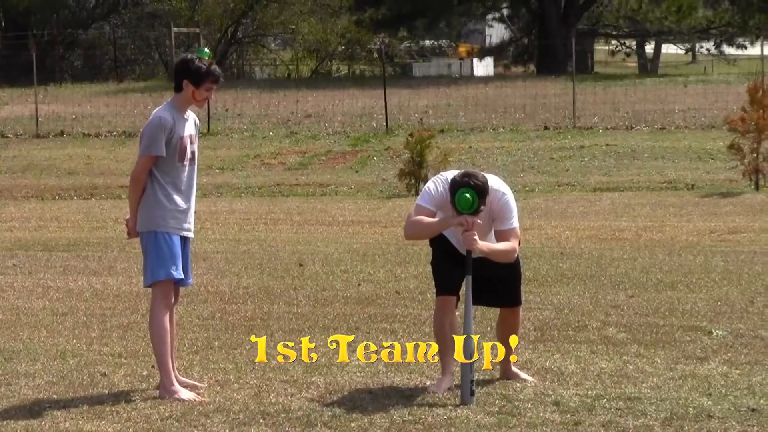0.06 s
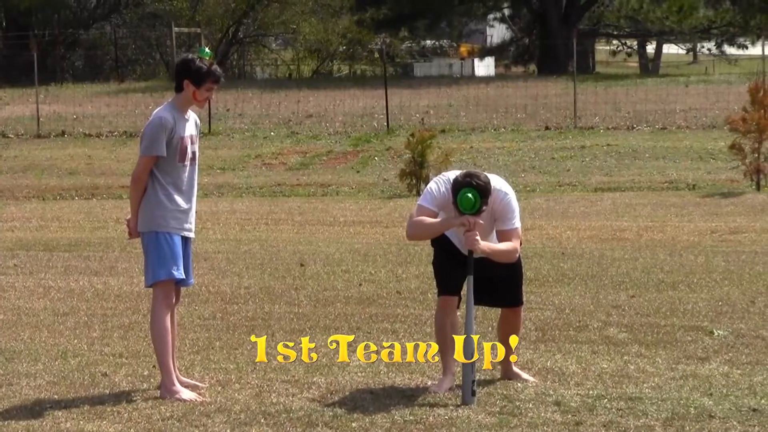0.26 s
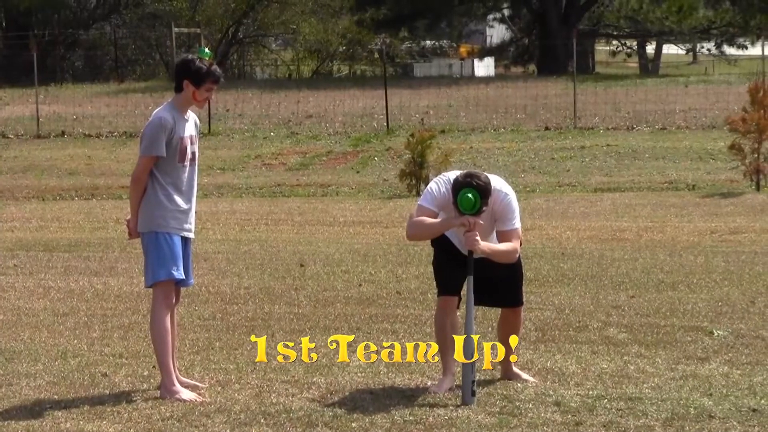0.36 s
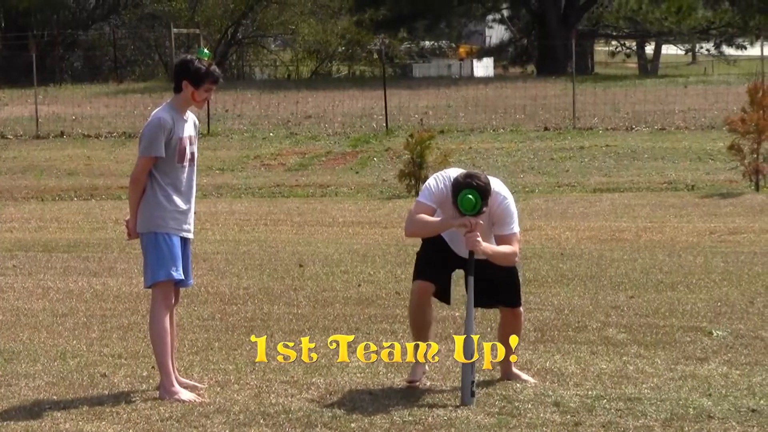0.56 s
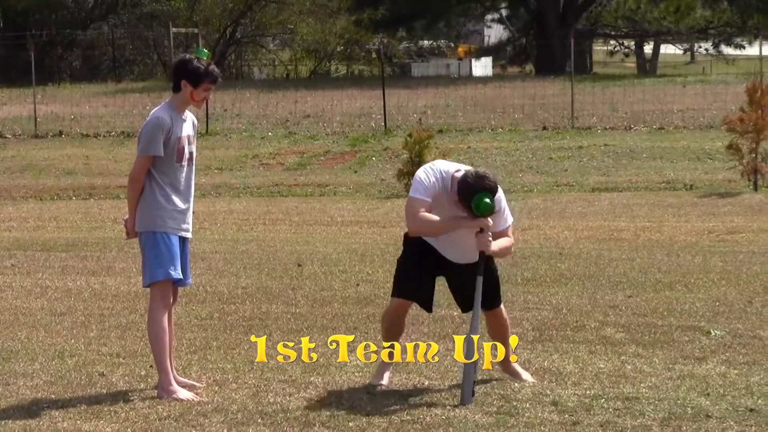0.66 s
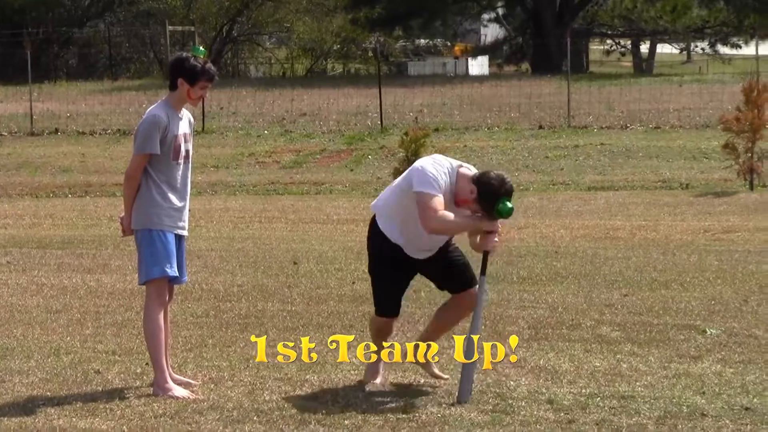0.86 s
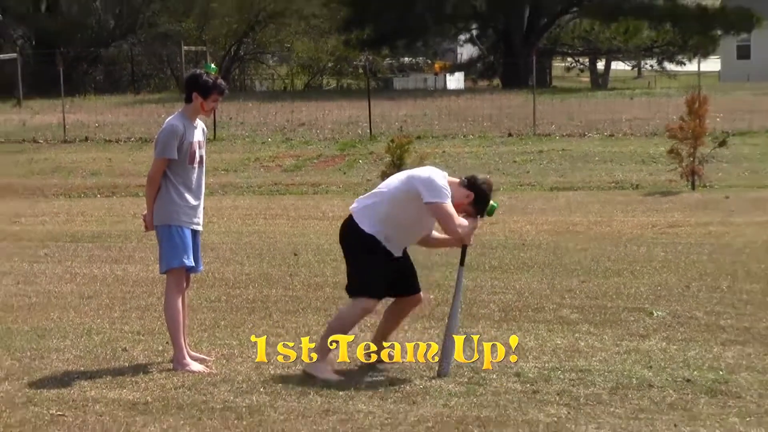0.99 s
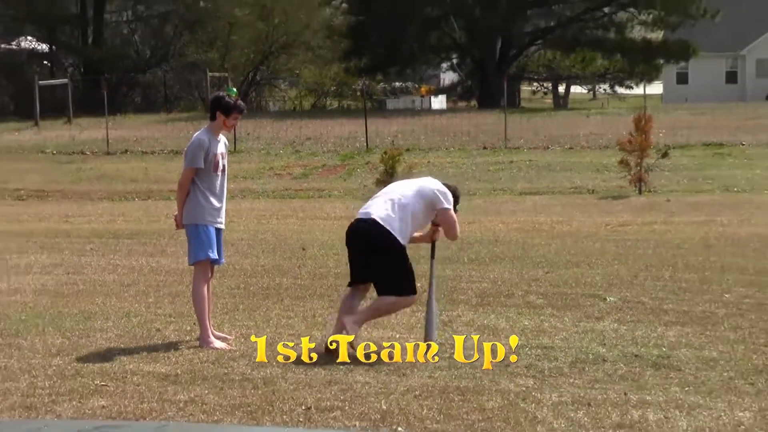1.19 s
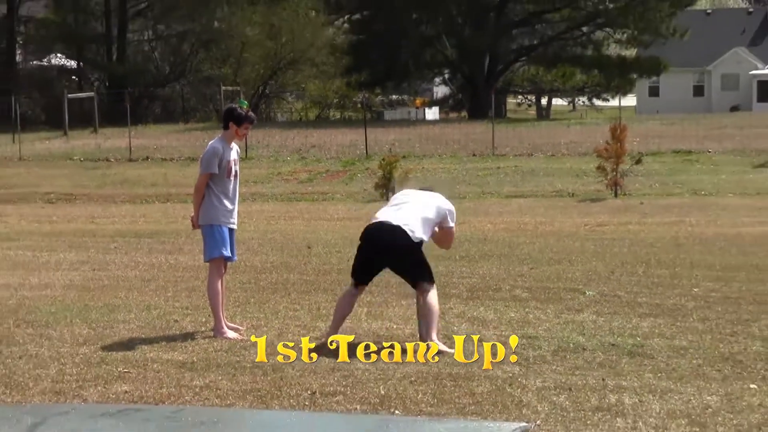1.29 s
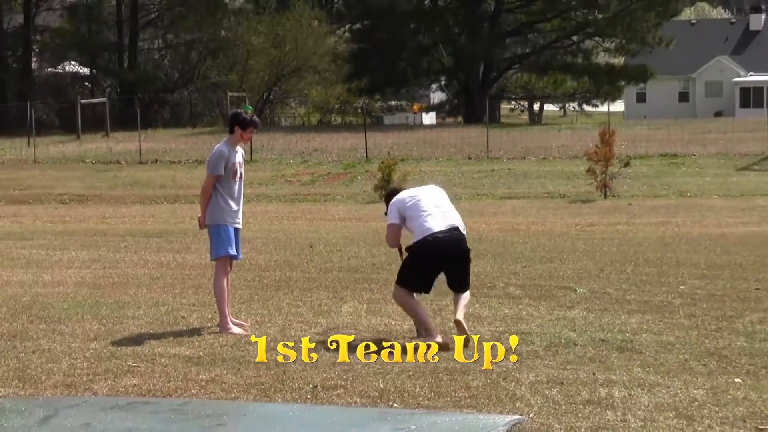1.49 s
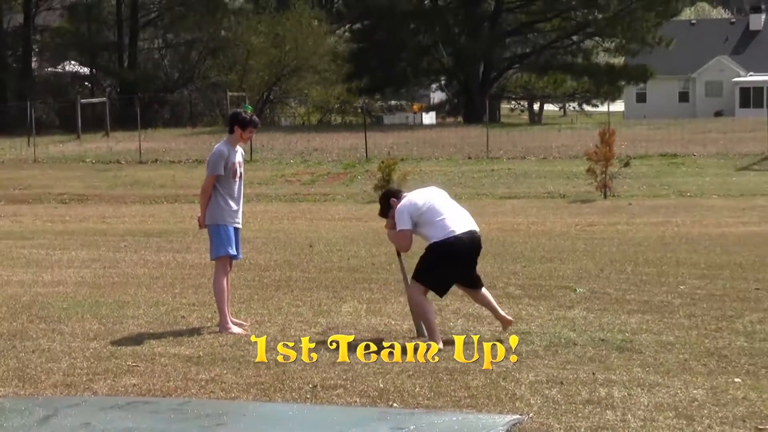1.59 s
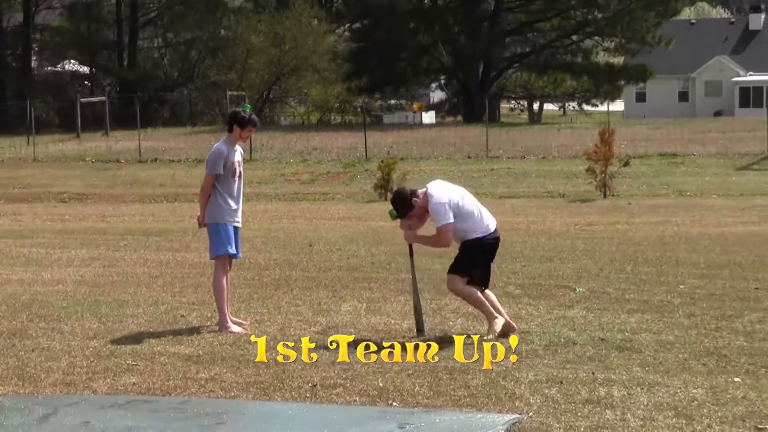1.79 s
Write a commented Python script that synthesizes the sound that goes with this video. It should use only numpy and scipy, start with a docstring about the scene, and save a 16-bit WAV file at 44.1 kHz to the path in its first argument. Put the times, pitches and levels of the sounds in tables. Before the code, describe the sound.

A handheld air horn close to the microphone gives one harsh blast under half a second long, starting with a squeal and settling into a steady blare; dull echoes fade into a quiet outdoor hush.

```python
"""Air horn in an open yard

A handheld air horn near the microphone gives one short blast: locked partials plus a breathy gas jet.
The diaphragm starts as a falling squeal an octave up, strains on its third partial, then drops into
its steady note. Nearby walls, a far house front and scattered trees return it as filtered echoes and
decaying noise, over a quiet outdoor hush of banded noise."""
import sys
import numpy as np
from scipy import signal
from scipy.io import wavfile
from scipy.ndimage import uniform_filter1d

SR = 44100
rng = np.random.default_rng(int(sys.argv[2]) if len(sys.argv) > 2 else 0)


def persist_wave(psi):
    """Save psi, clipped to +-1, as 16-bit WAV."""
    counts = np.round(np.clip(psi, -1, 1) * 32767).astype(np.int16)
    wavfile.write(sys.argv[1], SR, np.atleast_2d(counts).T)


N = 81585

START_S, STOP_S = .2358, .6263
ATTACK_S, RELEASE_S = .001, .0035
# Gas pressure driving the whole horn: (time [s], level [dB])
PRESSURE = [(.236, 2), (.25, 5), (.27, 2.5), (.3, 7.5), (.365, 10), (.38, 7), (.4, 5.5), (.45, 6),
            (.55, 4.5), (.62, 5)]


def horn():
    """Forced oscillation: gas pressure drives diaphragm and jet while the valve is open."""
    t = np.arange(N) / SR
    opening = (1 + np.tanh((t - START_S) / ATTACK_S - 1)) / 2
    closing = (1 - np.tanh((t - STOP_S) / RELEASE_S)) / 2
    return (diaphragm() + gas_jet()) * opening * closing * amp(in_time(PRESSURE))


STRAIN_HZ, STEADY_HZ, CREEP_HZ_PER_S = 929, 916.2, 9   # the steady note creeps up after the slip
SLIP_AT_S, SLIP_S = .374, .005
CHIRP_HZ, CHIRP_S = 526.6, .007   # extra pitch at the start and its decay time
JITTER_HZ, JITTER_RATE_HZ = 3.44, 180   # pitch shivers, most where the jet is loudest


def diaphragm_pitch():
    """Frequency modulation: a falling chirp, a slip from strain to the steady note, and jitter."""
    t = np.arange(N) / SR
    strain = (1 - np.tanh((t - SLIP_AT_S) / SLIP_S)) / 2
    creep = CREEP_HZ_PER_S * np.maximum(t - SLIP_AT_S, 0)
    rest = STEADY_HZ + (STRAIN_HZ - STEADY_HZ) * strain + creep
    chirp = CHIRP_HZ * np.exp(-np.maximum(t - START_S, 0) / CHIRP_S)
    jet_db = in_time(JET)
    jitter = JITTER_HZ * amp((jet_db - jet_db.max()) / 2) * drift(JITTER_RATE_HZ)
    return rest + chirp + jitter, rest


SPREAD_RAD = -.17   # phase offset, grows with the square of the partial number
WAVER_DB, WAVER_RATE_HZ = .5, 36   # each partial wavers on its own, the high ones more
RIGHT_LAG_S = 3e-5
# How far the diaphragm has come: (time [s], stage [0 squeal, 1 third partial caught, 2 full strain, 3 steady])
STAGE = [(.27, .01), (.282, 0.9), (.29, 0.97), (.362, 1.79), (.371, 1.97), (.379, 2.98)]
# Harmonic series of the diaphragm: (multiple of the pitch, level in stage 0 [dB], in stage 1 [dB],
# in stage 2 [dB], in stage 3 [dB], left minus right [dB])
PARTIALS = [(1, -46, -42.5, -25, -14.5, 4), (2, -18, -24.5, -26, -21, 7), (3, -48, -24, -11.5, -23, 2.5),
            (4, -26, -20, -34.5, -23, 9), (5, -66, -41, -25.5, -20, 2), (6, -24.5, -19.5, -37.5, -25, 3.5),
            (7, -42.5, -37, -31, -35, 7), (8, -37.5, -31.5, -40.5, -36.5, 3),
            (9, -52, -41.5, -47, -35.5, 2.5), (10, -41, -37, -54, -34, 3.5), (11, -66, -60, -47, -42, -3),
            (12, -66, -52, -63, -60.5, -4), (13, -81, -58, -61, -52, 3), (14, -91, -65, -85, -61, -9),
            (15, -93, -93, -86, -60, 7), (16, -90, -95, -104, -58, 2), (17, -95, -95, -89, -63, 2)]


def diaphragm():
    """Mode locking: every partial is an exact multiple of one pitch, with levels set by the regime."""
    pitch, rest = diaphragm_pitch()
    lag = 2 * np.pi * pitch * RIGHT_LAG_S * np.array([[0], [1]])
    phase = 2 * np.pi * np.cumsum(pitch) / SR - lag
    stage, out = in_time(STAGE), np.zeros((2, N))
    for k, *levels, lean_db in PARTIALS:
        stage_db = np.interp(stage, range(len(levels)), levels)
        swept_db = flare_db(k * pitch) - flare_db(k * rest)   # only the change away from rest
        waver_db = WAVER_DB * np.sqrt(k) * drift(WAVER_RATE_HZ)
        gain = np.sqrt(2) * amp(stage_db + swept_db + waver_db) * sides(lean_db)
        out -= gain * np.cos(k * phase + SPREAD_RAD * k * k)
    return out


FLARE_HZ, FLARE_WIDTH_HZ, FLARE_DB = 2840, 570, 16.5


def flare_db(hz):
    """Resonance: the flare lifts a partial that sweeps through it."""
    return FLARE_DB / (1 + ((hz - FLARE_HZ) / FLARE_WIDTH_HZ) ** 2)


# Breathiness of the gas jet: (time [s], level [dB])
JET = [(.236, -29), (.28, -39), (.33, -41), (.372, -28), (.4, -24.5), (.42, -51.5), (.6, -39), (.626, -32)]
# Spectrum of the jet, relative: (frequency [Hz], level [dB per Hz])
JET_COLOUR = [(500, -30), (800, 11), (1300, -2.5), (2500, 2.5), (4500, 10), (7000, -18), (10000, -39),
              (12000, -46), (15000, -50)]


def gas_jet():
    """Turbulence: the escaping gas is broadband noise whose bands flicker in level."""
    return amp(in_time(JET)) * banded_noise(JET_COLOUR, patchy_db=5.0)


# Single echoes: (delay [s], level [dB], left minus right [dB], low-pass cutoff [Hz])
ECHOES = [(.0035, -20, -19, 6040), (.012, -49, -24, 4860), (0.022, -19, -5, 4000), (0.031, -29.5, 14, 2000),
          (0.045, -19, -2, 6100), (.11, -36.5, -6, 1360), (0.329, -27, 4.5, 1450), (.47, -44.5, 12, 1450),
          (.7, -47, 5.5, 2050)]


def flat_echoes():
    """Specular reflection: each flat surface returns one delayed, dulled copy."""
    answer = np.zeros((2, N))
    for delay, level_db, lean_db, cut_hz in ECHOES:
        click = (np.arange(N) == int(delay * SR)) * amp(level_db) * sides(lean_db)
        low_pass = signal.butter(2, cut_hz, fs=SR, output="sos")
        answer += signal.sosfilt(low_pass, click + 1e-18)
    return answer


SCATTER_SHARED = 0.95   # share of power common to left and right
# Diffuse returns, near walls then far trees and fences:
# (start [s], level before band filter [dB], time to fall 60 dB [s], band low [Hz], band high [Hz])
SCATTER = [(.006, -11.5, 0.3, 1110, 5940), (.05, -21, 1.72, 1560, 2440), (0.049, -23.5, 1.52, 2960, 5700)]


def scattered_returns():
    """Diffuse reflection: many small returns merge into exponentially decaying noise."""
    t, answer = np.arange(N) / SR, np.zeros((2, N))
    for start, level_db, t60, low_hz, high_hz in SCATTER:
        mid, side = rng.standard_normal((2, N))
        noise = np.sqrt(SCATTER_SHARED) * mid + np.sqrt(1 - SCATTER_SHARED) * side * [[1], [-1]]
        tail = noise * amp(-60 * t / t60) * (t > start)
        band = signal.butter(2, [low_hz, high_hz], "band", fs=SR, output="sos")
        # dividing by sqrt(N) gives the tail unit energy
        answer += amp(level_db) * signal.sosfilt(band, rms_one(tail) / np.sqrt(N) + 1e-18)
    return answer


def yard(direct):
    """Linear superposition: convolving the blast with the yard's impulse response adds every return."""
    answer = flat_echoes() + scattered_returns()
    return signal.fftconvolve(answer, direct.mean(axis=0)[None], axes=1)[:, :N]


HUSH_DB = -44.5
# Spectrum of the outdoor hush, relative: (frequency [Hz], level [dB per Hz])
HUSH = [(15, -53), (25, -41.5), (82, 1), (221, -5), (267, -7.5), (421, -9.5), (648, -9.5), (871, -13),
        (8810, -21.5), (13500, -50.5), (15500, -53)]


def hush():
    """Ambient noise: a nearly steady, partly coherent stereo noise floor."""
    return amp(HUSH_DB) * banded_noise(HUSH, patchy_db=0.3)


# Coherence of the stereo noise: (frequency [Hz], left-right correlation [-1 to 1])
LIKENESS = [(60, 0.99), (180, 1), (550, 0.79), (1650, 0.91), (4970, 0.99), (15000, 0.65)]
# Stereo balance of the noise: (frequency [Hz], left minus right [dB])
LEAN = [(60, 1.5), (240, -2), (950, 1.5), (3770, 1.0), (15000, 1.0)]


def banded_noise(spectrum, patchy_db):
    """Subband synthesis: half-octave noise bands with own level, flicker and coherence; rms 1."""
    out, edges = 0, 22 * 2 ** np.arange(0, 10, .5)
    white = rng.standard_normal((2, 2, N))   # neighbouring bands use different noise
    for k, (low, high) in enumerate(zip(edges, edges[1:])):
        band = signal.butter(2, [low, high], "band", fs=SR, output="sos")
        mid, side = signal.sosfilt(band, white[k % 2])
        hz = np.sqrt(low * high)
        alike = at_hz(LIKENESS, hz)
        gain = amp(at_hz(spectrum, hz) + patchy_db * drift(6.1)) * sides(at_hz(LEAN, hz))
        out = out + gain * (np.sqrt(1 + alike) * mid + np.sqrt(1 - alike) * side * [[1], [-1]])
    return rms_one(out)


def drift(rate_hz):
    """Low-pass random process: two equal poles at rate_hz smooth white noise; rms 1."""
    step = 40   # samples between computed points
    r = np.exp(-2 * np.pi * rate_hz * step / SR)
    white = rng.standard_normal(N // step + 2002)
    slow = signal.lfilter([1], [1, -2 * r, r * r], white)[2000:]   # drop the filter's settling
    return np.interp(np.arange(N) / step, np.arange(len(slow)), rms_one(slow))


def amp(db):
    """Decibel law: 20 dB is a factor of ten in amplitude."""
    return 10 ** (np.asarray(db) / 20)


def sides(db):
    """Level-difference stereo: gains for left and right that differ by db."""
    return amp(np.array([[db / 2], [-db / 2]]))


def rms_one(x):
    """Power normalisation: scale to unit root mean square."""
    return x / np.sqrt(np.mean(x ** 2) + 1e-20)


def in_time(rows):
    """Linear interpolation of (time, value) rows at every sample."""
    return np.interp(np.arange(N) / SR, *np.transpose(rows))


def at_hz(points, hz):
    """Interpolation of (frequency, value) rows on a logarithmic frequency axis."""
    table = np.array(points)
    return np.interp(np.log(hz), np.log(table[:, 0]), table[:, 1])


def scene():
    """Superposition: direct blast, its returns from the yard and the outdoor hush."""
    blast = horn()
    return blast + yard(blast) + hush()


GAIN_FROM_DB, GAIN_SHARE = -33.5, 0.23   # threshold, and dB turned down per dB above it
GAIN_ATTACK_S, GAIN_BACK_DB_PER_S = 0.011, 12.5
CEILING, CUTOFF_HZ = .95, 15900


def record(dry):
    """Dynamic compression: quick gain reduction, slow return; then soft limiting and a low-pass."""
    t = np.arange(N) / SR
    power = uniform_filter1d(np.mean(dry ** 2, axis=0), size=441)   # 10 ms average
    level_db = 10 * np.log10(power + 1e-12)
    cut_db = GAIN_SHARE * np.maximum(level_db - GAIN_FROM_DB, 0)
    # a running maximum on a rising ramp holds each peak and lets it fall at a constant rate
    ramp_db = GAIN_BACK_DB_PER_S * t
    held_db = np.maximum.accumulate(cut_db + ramp_db) - ramp_db
    r = np.exp(-1 / (GAIN_ATTACK_S * SR))
    wet = dry * amp(-signal.lfilter([1 - r], [1, -r], held_db))
    wet = wet / (1 + (wet / CEILING) ** 16) ** (1 / 16)   # rounds only the highest peaks
    low_pass = signal.cheby2(28, 70, CUTOFF_HZ, fs=SR, output="sos")
    return signal.sosfilt(low_pass, wet)


dry = scene()
out = record(dry)
persist_wave(out)
```